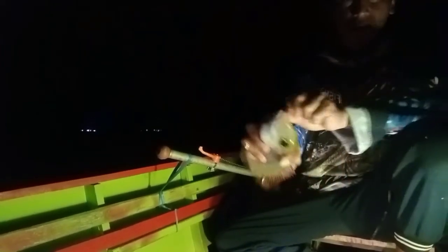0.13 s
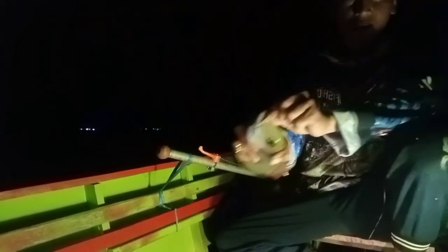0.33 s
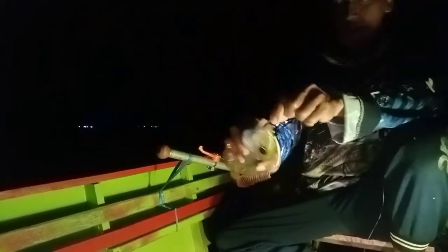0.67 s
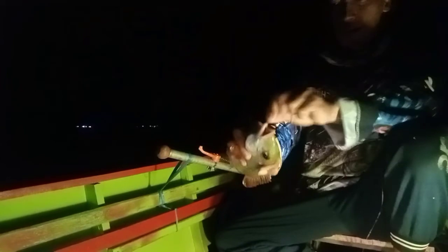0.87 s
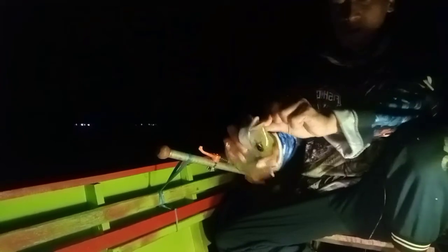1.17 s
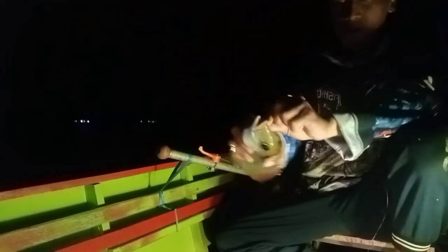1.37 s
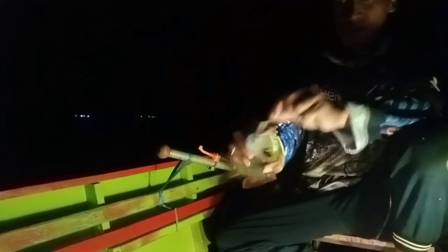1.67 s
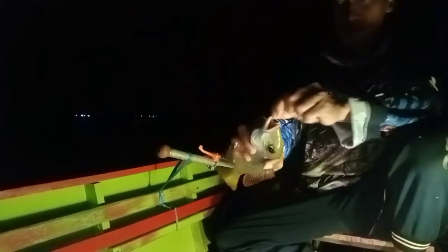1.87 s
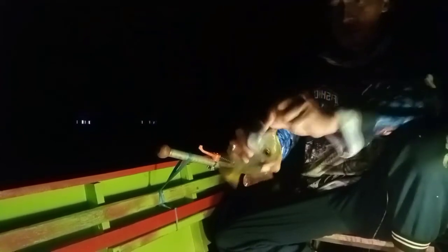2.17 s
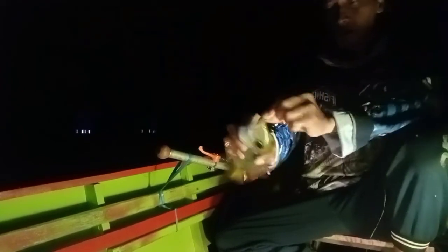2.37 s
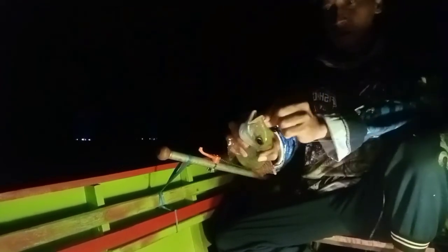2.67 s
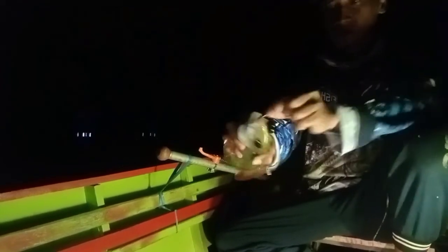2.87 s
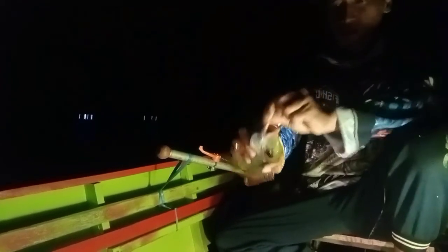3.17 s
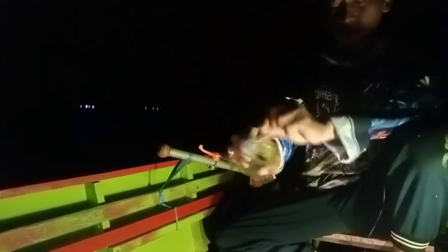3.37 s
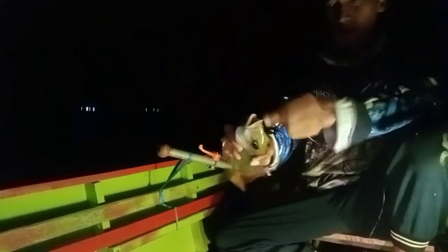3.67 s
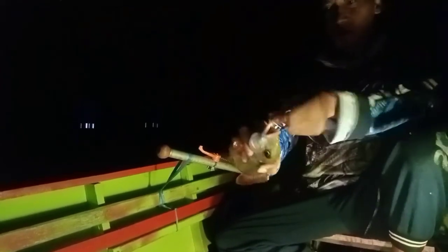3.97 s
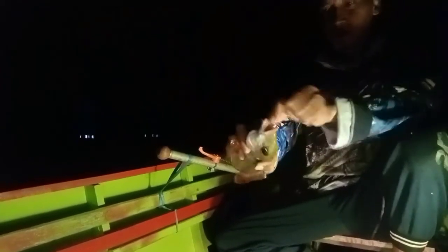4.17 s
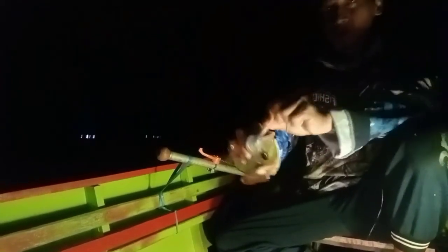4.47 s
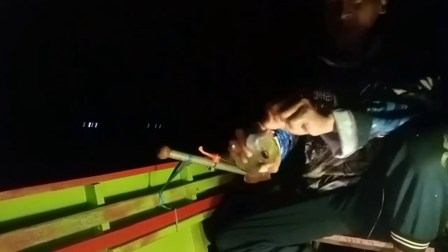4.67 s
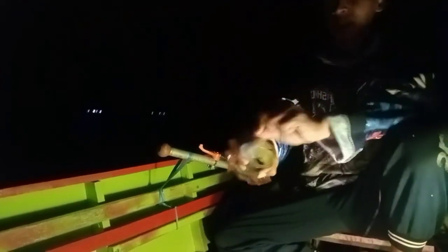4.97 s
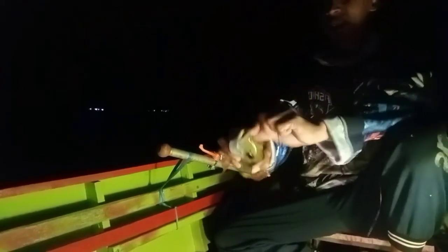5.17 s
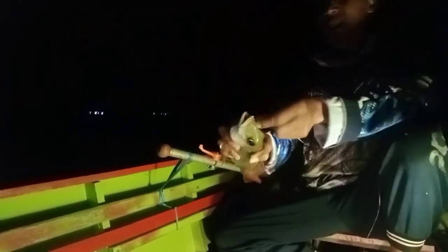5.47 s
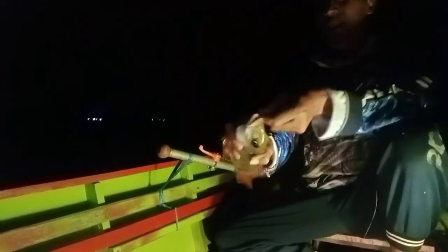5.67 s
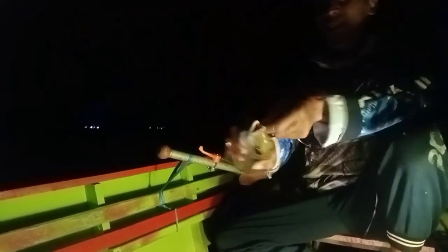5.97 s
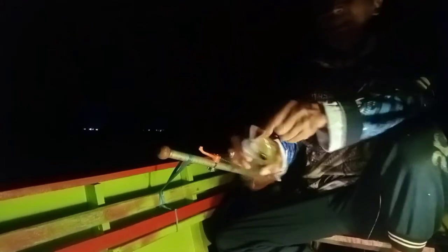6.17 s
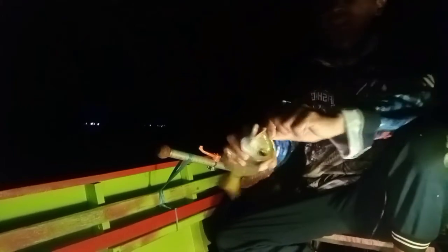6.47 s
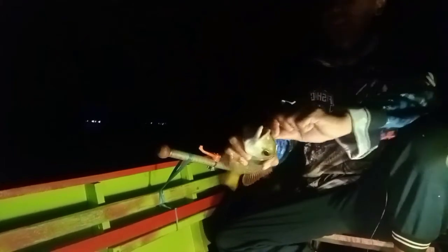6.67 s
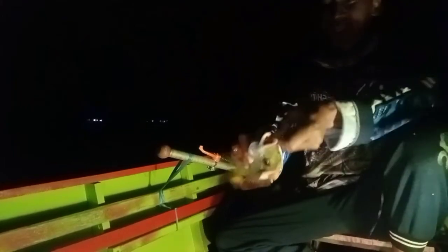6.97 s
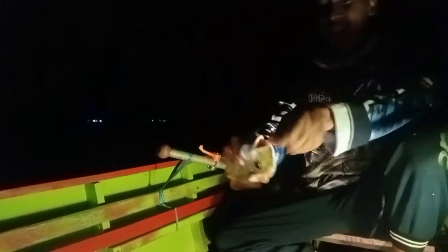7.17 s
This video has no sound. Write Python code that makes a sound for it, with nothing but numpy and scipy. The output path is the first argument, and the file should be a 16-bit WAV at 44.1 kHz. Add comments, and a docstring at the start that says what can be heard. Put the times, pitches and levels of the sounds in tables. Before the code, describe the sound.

Small waves slap and plop against a wooden boat while a hook clicks and scrapes as a fish is unhooked by hand.

```python
"""A small fish is unhooked by hand in a wooden boat drifting on calm water at night (right channel only).
A sharp hook click and a hull thud open the scene; wavelets slap the planks and trap air that plops.
From two seconds, hook and wet fingers click and scrape close by while skin, line and sleeve rub.
Just after four seconds the biggest slap throws spray that patters down; a round plop follows near six.
The clicks crowd together, the line squeaks once, and the hull ends on a swelling rumble and thuds."""
import sys
import numpy as np
from scipy import signal
from scipy.fft import rfft, irfft
from scipy.io import wavfile

SR = 44100
rng = np.random.default_rng(int(sys.argv[2]) if len(sys.argv) > 2 else 0)


def master(y):
    """Save y as 16-bit WAV."""
    cut = np.clip(np.atleast_2d(y).T, -1, 1)
    pcm = np.round(cut * 32767)  # scale
    wavfile.write(sys.argv[1], SR, pcm.astype(np.int16))


N = 322787


def from_db(db):
    """Decibels to gain."""
    return 10 ** (np.asarray(db) / 20)


def rms_one(x):
    """Scale to rms 1."""
    return x / np.sqrt(np.mean(x ** 2) + 1e-20)


def automation(points):
    """Join (time_s, value) points into one value per sample."""
    times, values = np.transpose(points)
    return np.interp(np.arange(N) / SR, times, values)


def add(track, start_s, sound):
    """Mix a sound into a track."""
    start = max(0, round(start_s * SR))
    track[start:start + len(sound)] += sound[:max(0, N - start)]


def seconds(length_s):
    """Time axis of a short sound, slightly padded."""
    return np.arange(int(length_s * SR) + 64) / SR


def band(x, low_hz, high_hz, order=2):
    """Butterworth band-pass."""
    high_hz = min(high_hz, .45 * SR)
    low_hz = min(low_hz, .9 * high_hz)
    return signal.sosfilt(signal.butter(order, [low_hz, high_hz], "band", fs=SR, output="sos"), x)


def resonance(x, hz, width_hz):
    """Two-pole resonance with unity gain at its peak."""
    radius = np.exp(-np.pi * width_hz / SR)
    feedback = [1, -2 * radius * np.cos(2 * np.pi * hz / SR), radius ** 2]
    return signal.lfilter(np.array([1, 0, -1]) * (1 - radius ** 2) / 2, feedback, x)


def resonator_bank(x, modes):
    """Parallel resonances from (pitch_hz, width_hz, gain_db) rows."""
    return sum(from_db(db) * resonance(x, hz, width_hz) for hz, width_hz, db in modes)


def coloured(x, spectrum):
    """Shape a full-length sound with an EQ curve; rms 1."""
    hz, db = np.transpose(spectrum)
    bins_hz = np.maximum(np.fft.rfftfreq(N, 1 / SR), 1)
    curve_db = np.interp(np.log(bins_hz), np.log(hz), db)
    return rms_one(irfft(rfft(x) * from_db(curve_db), N))


def drift(rate_hz):
    """Wandering random modulation; rms 1."""
    knots = rng.standard_normal(int(rate_hz * N / SR) + 2)
    return rms_one(np.interp(np.arange(N) / SR * rate_hz, np.arange(len(knots)), knots))


def swell(t, rise_s, t60_s):
    """Rounded attack to 1, then a decay of 60 dB every t60_s."""
    attack = np.sin(np.pi / 2 * np.minimum(t / rise_s, 1)) ** 2
    return attack * np.exp(-np.log(1000) * np.maximum(t - rise_s, 0) / t60_s)


def with_energy(x, envelope):
    """Give a burst the energy of unit noise under this envelope."""
    return x * np.sqrt(np.sum(envelope ** 2) / (np.sum(x ** 2) + 1e-20))


def grains(samples, per_s, spread_db):
    """Random tiny impacts of uneven size."""
    born = rng.random(samples) < per_s / SR
    polarity = rng.choice([-1, 1], samples)
    size = from_db(spread_db * np.clip(rng.standard_normal(samples), -2, 2))
    return born * polarity * size + 1e-12


def shower(db, centre_hz, octaves, rise_s, t60_s, per_s, spread_db):
    """A grainy burst: a shower of tiny impacts, band-passed around centre_hz."""
    t = seconds(rise_s + t60_s)
    envelope = swell(t, rise_s, t60_s)
    impacts = grains(len(t), per_s, spread_db) * envelope
    sound = band(impacts, centre_hz * 2 ** (-octaves / 2), centre_hz * 2 ** (octaves / 2), order=3)
    return from_db(db) * with_energy(sound, envelope)


def droplets(per_s, low_hz, high_hz, q, spread_db, pitches):
    """Small bubbles born at random, each ringing at one of a set of pitches; rms 1."""
    births = grains(N, per_s, spread_db)
    voice = rng.integers(0, pitches, N)
    return rms_one(sum(resonance(births * (voice == k), hz, hz / q) / np.sqrt(hz)
                       for k, hz in enumerate(np.geomspace(low_hz, high_hz, pitches))))


def rings(tones, rise_cycles, glide, wobble):
    """Damped tones; glide (over one t60) and random wobble are shares of the pitch."""
    out = np.zeros(N)
    for start_s, hz, db, t60_s in tones:
        rise_s = rise_cycles / hz
        t = seconds(rise_s + t60_s)
        jitter = np.interp(t * hz / 2, np.arange(256), rng.standard_normal(256))
        phase = 2 * np.pi * np.cumsum(hz * (1 + glide * t / t60_s + wobble * jitter)) / SR
        add(out, start_s, from_db(db) * swell(t, rise_s, t60_s) * np.sin(phase))
    return out


# Tone of the night air: frequency_hz, gain_db
AIR_EQ = [(60, -11), (150, 7.5), (300, 0), (500, -4.5), (700, -5.5), (950, -7.5), (1600, -13.5),
          (2700, -13), (3900, -20), (5200, -17.5), (6000, -31), (7000, -23), (7800, -25), (9500, -23.5),
          (12500, -26.5), (14500, -24.5)]
def night_air(hiss_db=-67.5, hollow_hz=1200, width_hz=104, hollow_db=-74, swing_db=4):
    """A bed of faint, steady hiss with one hollow resonance that wavers in level."""
    hollow = resonance(rng.standard_normal(N), hollow_hz, width_hz)
    hollow = rms_one(resonance(hollow, hollow_hz, width_hz))
    hollow *= from_db(hollow_db + swing_db * drift(rate_hz=7))
    return from_db(hiss_db) * coloured(rng.standard_normal(N), AIR_EQ) + hollow


# Level ride of the rocking boat, before the rumble's boost: time_s, level_db
ROCKING = [(0.0, -64), (0.22, -71), (1.41, -69), (1.61, -63.5), (1.89, -68.5), (2.16, -60.5), (2.75, -71.5),
           (3.97, -70.5), (4.3, -64.5), (4.56, -67.5), (4.89, -54.5), (5.11, -65), (5.38, -76), (5.81, -63),
           (6.2, -76.5), (7.01, -59), (7.22, -48), (7.32, -36)]
# Tone of the rumble: frequency_hz, gain_db
RUMBLE_EQ = [(25, -25), (45, -10.5), (70, 0.5), (105, -2), (150, -10), (240, -21), (400, -32), (800, -75)]
def hull_rumble(boost_db=8, lumps_db=2.5):
    """The rocking hull rumbles low, in lumps."""
    lumps = rms_one(from_db(lumps_db * drift(rate_hz=15)))
    return from_db(automation(ROCKING) + boost_db) * lumps * coloured(rng.standard_normal(N), RUMBLE_EQ)


# Soft thuds of the hull: start_s, pitch_hz, level_db, t60_s
THUDS = [(0.037, 147.6, -35.5, 0.27), (0.508, 71, -47.5, 0.41), (1.016, 94.5, -47, 0.55),
         (1.576, 72.5, -43.5, 0.42), (1.785, 69.5, -34, 0.12), (2.012, 65.6, -44, 0.12),
         (2.205, 74, -43.5, 0.17), (4.684, 72, -34, 0.15), (4.772, 85, -30, 0.2),
         (4.992, 73.5, -33.5, 0.11), (5.644, 66, -35.5, 0.073), (6.434, 96, -32.5, 0.077),
         (6.684, 68.5, -45.5, 0.17), (7.112, 76.5, -29, 0.37), (7.239, 86.5, -22, 0.2),
         (7.274, 101, -28, 0.24)]
# Partials of each thud: pitch_ratio, gain_db, t60_ratio
THUD_MODES = [(1, 0, 0.97), (2.45, -22, 0.36)]
def hull_thuds():
    """Now and then the hull thuds with two low partials that sag in pitch."""
    tones = [(start_s, hz * pitch_ratio, db + gain_db, t60_s * t60_ratio)
             for start_s, hz, db, t60_s in THUDS for pitch_ratio, gain_db, t60_ratio in THUD_MODES]
    return rings(tones, rise_cycles=1, glide=-.093, wobble=.12)


# Narrow, hollow-sounding resonances: pitch_hz, width_hz, gain_db
HOLLOW_MODES = [(611, 30, -4), (1200, 33, 2.5)]
def hollow_ring(x):
    """Two faint hollow resonances, near 600 and 1200 Hz, ring along with nearby sounds."""
    return resonator_bank(x, HOLLOW_MODES)


def boat_echo(x, rise_s=.0079, t60_s=.077, echo_db=-15):
    """Planks and thwarts throw back a short, dull scatter."""
    t = seconds(2 * t60_s)
    scatter = band(rng.standard_normal(len(t)), 150, 3200, order=1) * swell(t, rise_s, t60_s)
    scatter /= np.sqrt(np.sum(scatter ** 2))
    return from_db(echo_db) * signal.fftconvolve(x, scatter)[:N]


# Wetness ride; fizz and sticky skin follow its swing around the mean: time_s, level_db
WETNESS = [(0.0, -91), (0.8, -79.5), (1.1, -65), (1.4, -92), (1.8, -76.5), (2.22, -73), (2.42, -86),
           (2.8, -77.5), (3.3, -87.5), (3.75, -87.5), (4.12, -73), (4.26, -67.5), (4.42, -70), (4.62, -68),
           (4.95, -84), (5.45, -85.5), (5.95, -72), (6.4, -74.5), (6.85, -86.5), (7.1, -56), (7.32, -70)]
def wetness_gain(base_db, follows):
    """A gain that rises above base_db when things are wetter and falls when they are drier."""
    wetness_db = automation(WETNESS)
    return from_db(base_db + follows * (wetness_db - wetness_db.mean()))


# Tone of the fizz: frequency_hz, gain_db
FIZZ_EQ = [(500, 3.5), (1200, 2.5), (2700, 3.5), (4600, -2), (5800, -1), (7400, -10.5), (8800, -3),
           (11500, -12), (15000, -9)]
def wet_fizz(clump_db=3.5):
    """Water films burst on scales, fingers and planks: a softly clumped fizz with tiny pitched pops."""
    pops = droplets(per_s=1200, low_hz=1300, high_hz=14000, q=26, spread_db=3, pitches=30)
    crackle = rms_one(grains(N, per_s=9000, spread_db=3))
    clumps = from_db(clump_db * drift(rate_hz=40))
    return wetness_gain(base_db=-76, follows=.77) * coloured((crackle + pops) * clumps, FIZZ_EQ)


# Water swelling along the planks: start_s, level_db, centre_hz, t60_s
SURGES = [(1.893, -56, 397, 0.081), (2.034, -66, 240, 0.087), (2.126, -57, 560, 0.063),
          (2.837, -58.5, 1200, 0.15), (4.183, -50.5, 860, 0.41), (4.234, -45.5, 850, 0.2),
          (4.92, -66, 1010, 0.19), (5.061, -65, 1200, 0.38), (5.172, -70, 1430, 0.067),
          (5.97, -65, 1000, 0.39), (6.882, -58.5, 720, 0.21), (6.94, -50.5, 760, 0.32)]
def surges(wash_db=-2.5, bubbles_db=-1, octaves=2.8, rise_share=.11):
    """Water swells along the planks as a soft wash with bubbles in it."""
    wash, flow = np.zeros(N), np.zeros(N)
    for start_s, db, hz, t60_s in SURGES:
        rise_s = rise_share * t60_s
        add(wash, start_s, shower(db, hz, octaves, rise_s, t60_s, per_s=4500, spread_db=0))
        add(flow, start_s, from_db(db) * swell(seconds(rise_s + t60_s), rise_s, t60_s))
    bubbles = droplets(per_s=300, low_hz=480, high_hz=1500, q=18, spread_db=2.5, pitches=14)
    return from_db(wash_db) * wash + from_db(bubbles_db) * flow * bubbles


# Bunches of spray landing: start_s, level_db, centre_hz
SPLATS = [(4.373, -58.5, 5300), (4.388, -53.5, 3900), (4.417, -54, 5490), (4.438, -52, 3850),
          (4.471, -55, 6900), (4.528, -51.5, 3300), (4.54, -56, 3520), (4.573, -54.5, 3830),
          (4.58, -55, 6900), (4.605, -54.5, 5060)]
def spray(start_s=4.34, rise_s=.06, t60_s=1.15, level_db=-57, bubbles_db=-1, bunch_db=2):
    """Spray from the biggest slap falls back as a dense patter with wet splats and small bubbles."""
    falling, splats = np.zeros(N), np.zeros(N)
    drops = droplets(per_s=2600, low_hz=2000, high_hz=9500, q=14, spread_db=2.5, pitches=26)
    bunches = from_db(bunch_db * drift(rate_hz=70))
    patter = rms_one(band(drops * bunches, 2300, 6500, order=1))
    bubbles = droplets(per_s=260, low_hz=520, high_hz=2200, q=24, spread_db=2.5, pitches=18)
    add(falling, start_s, from_db(level_db) * swell(seconds(rise_s + t60_s), rise_s, t60_s))
    for splat_s, db, hz in SPLATS:
        splat = shower(db, hz, octaves=1.07, rise_s=.0025, t60_s=.05, per_s=2700, spread_db=4)
        add(splats, splat_s, splat)
    return falling * (patter + from_db(bubbles_db) * bubbles) + splats


# Single drips and bubbles: start_s, pitch_hz, level_db
DRIPS = [(1.572, 2770, -42), (1.707, 2650, -43), (1.859, 1990, -47), (2.551, 427, -54.5), (2.6, 950, -53.5),
         (2.632, 832, -46), (4.35, 623, -52), (4.378, 970, -55), (4.427, 746, -50), (4.537, 670, -55.5),
         (4.547, 1420, -53), (4.583, 1880, -44), (4.622, 677, -50.5), (4.65, 1970, -53.5), (4.9, 1560, -55),
         (5.083, 1430, -52), (5.18, 1605, -50), (5.245, 377, -60), (5.793, 853, -52), (6.001, 1390, -52),
         (6.086, 735, -53), (6.152, 1216, -48), (6.186, 690, -58.5), (6.215, 2380, -61),
         (6.316, 930, -56.5), (6.832, 540, -54.5), (6.912, 740, -50), (6.98, 670, -52), (6.996, 570, -48),
         (7.021, 665, -49), (7.044, 608, -49.5)]
def drips(t60_cycles=34):
    """Single bubbles chirp upward; all ring for as many cycles, so high ones die sooner."""
    tones = [(start_s, hz, db, t60_cycles / hz) for start_s, hz, db in DRIPS]
    return rings(tones, rise_cycles=2.2, glide=.038, wobble=.072)


# Wavelets on the planks (splash and knock are relative to the slap):
# start_s, level_db, centre_hz, width_octaves, rise_s, t60_s, splash_db, knock_db
WAVELETS = [(.023, -34.5, 258, 1.08, 0.0085, 0.17, -25, -10), (0.065, -44.5, 283, 1.3, .003, 0.047, -9, -2),
            (.175, -62, 387, 0.78, .005, 0.12, -22, -8), (1.013, -36.5, 250, 1.38, 0.012, 0.25, -15, -9),
            (1.072, -34, 980, 1.67, 0.0051, 0.071, -17, -20.5),
            (2.286, -49, 1290, 2.4, 0.0071, 0.12, -8, -10),
            (2.314, -32.5, 680, 1.1, 0.0042, 0.057, -21, -12.5),
            (2.656, -37.5, 870, 2.4, 0.0013, 0.059, -16, -12),
            (2.693, -44.5, 840, 1.1, .006, 0.079, -8, -9),
            (2.744, -46, 1520, 1.86, 0.0046, 0.056, -16, -11.5),
            (2.803, -49.5, 920, 1.2, 0.0025, 0.057, -16, -17),
            (4.162, -32, 1160, 1.56, 0.0047, .1, -18, -17), (4.256, -36.5, 915, 2.6, 0.02, 0.11, -15, 1.5),
            (4.274, -28.5, 770, 2.5, 0.0023, 0.049, -22, -10.5),
            (4.994, -56, 190, 1.4, 0.0028, 0.15, -10, -6), (5.119, -56.5, 950, 2.4, 0.0026, 0.13, -21, -13),
            (5.861, -31.5, 295, 1.6, .005, 0.16, -15, -4.5),
            (5.937, -49.5, 980, 1.3, .003, 0.085, -19, 0.5),
            (6.864, -52.5, 1460, 1.6, 0.0027, 0.056, -22, -19),
            (7.111, -29.5, 926, 1.42, 0.0038, 0.075, -29, -5)]
def slaps(splash_hz=1480, splash_octaves=1.57, splash_stretch=1.24):
    """Wavelets hit the planks; each slap carries a fine splash that lasts a little longer."""
    out = np.zeros(N)
    for start_s, db, hz, octaves, rise_s, t60_s, splash_db, _ in WAVELETS:
        add(out, start_s, shower(db, hz, octaves, rise_s, t60_s, per_s=5000, spread_db=2))
        add(out, start_s, shower(db + splash_db, splash_hz, splash_octaves, rise_s,
                                 splash_stretch * t60_s, per_s=5800, spread_db=4))
    return out


# Wooden body of each knock: pitch_hz, gain_db
PLANK_MODES = [(184, 2.5), (238, 1.5)]
def plank_knocks(t60_s=.1):
    """The planks answer each slap with a low knock."""
    tones = [(start_s, hz, db + knock_db + gain_db, t60_s)
             for start_s, db, *_, knock_db in WAVELETS for hz, gain_db in PLANK_MODES]
    return rings(tones, rise_cycles=2.8, glide=0, wobble=.019)


# Air pockets under the wavelets: start_s, pitch_hz, level_db, t60_s, glide_share
POCKETS = [(.025, 319, -34.5, .12, 0), (.041, 308, -29.5, 0.12, -0.031), (.071, 290, -32.5, 0.065, 0.041),
           (0.178, 383, -46.5, 0.14, 0), (1.016, 375, -37, .14, -0.06), (1.027, 263, -35, .11, 0),
           (1.049, 353, -34, 0.074, 0), (1.079, 1244, -25.5, 0.038, 0.059), (2.293, 1104, -33, 0.12, -0.12),
           (2.315, 383, -32.5, 0.082, -0.017), (2.319, 771, -26.5, 0.046, 0.11),
           (2.323, 938, -33.5, 0.056, -0.011), (2.659, 246, -32, 0.066, 0), (2.679, 260, -45, 0.055, 0),
           (2.693, 1200, -44, 0.055, -0.22), (2.707, 233, -42, .07, 0.048), (2.709, 613, -40, 0.033, 0),
           (2.745, 1360, -44.5, 0.029, 0), (2.806, 1166, -47.5, 0.04, -0.019),
           (4.163, 1382, -30, 0.042, -0.022), (4.17, 400, -38, 0.13, 0.018), (4.267, 1267, -32.5, .07, 0),
           (4.272, 183, -25.5, 0.15, -0.028), (4.275, 464, -31, 0.06, -0.025),
           (4.276, 637, -32, .05, -0.025), (4.339, 283, -44, 0.036, -0.026), (4.368, 576, -42.5, .11, 0.16),
           (4.998, 180, -43, .13, 0), (5.125, 672, -48.5, 0.038, 0), (5.861, 233, -27, .1, -0.073),
           (5.87, 338, -18.5, 0.097, -0.13), (5.872, 436, -26, .1, -0.0092),
           (5.9, 321, -25.5, 0.096, 0.022), (5.904, 764, -37.5, 0.057, 0), (5.926, 289, -35, 0.078, 0.024),
           (5.936, 1200, -50.5, .06, 0), (7.11, 270, -24, 0.092, 0.015), (7.113, 1238, -35, 0.08, -0.047),
           (7.117, 597, -20, 0.066, -0.024), (7.132, 576, -28.5, 0.14, 0.02)]
def plops():
    """Trapped air plops; its pitch slides as the pocket is squeezed or opens out."""
    return sum(rings([tone], rise_cycles=1.32, glide=glide, wobble=.06) for *tone, glide in POCKETS)


def lapping_water(gurgle_db=-28, calm_db=-80, settle_s=.09):
    """Slaps, plops, knocks and drips; small bubbles gurgle after each slap until the water settles."""
    hits = slaps()
    release = np.exp(-1 / (settle_s * SR))
    stirred = np.sqrt(signal.lfilter([1 - release], [1, -release], hits ** 2) + 1e-18)  # rms follower
    bubbles = droplets(per_s=160, low_hz=500, high_hz=2400, q=18, spread_db=3.5, pitches=26)
    gurgle = (from_db(gurgle_db) * stirred + from_db(calm_db)) * bubbles
    return hits + gurgle + plops() + plank_knocks() + drips()


def sticky_skin(smacks_per_s=16, range_db=9, low_hz=2400, high_hz=9000):
    """Wet skin peels off fingers and sleeve in soft, irregular smacks, louder when things are wetter."""
    out = np.zeros(N)
    for when, softness, height in rng.random((int(smacks_per_s * N / SR), 3)):
        hz = low_hz * (high_hz / low_hz) ** (height ** 2)  # favours the low end
        smack = shower(-range_db * softness, hz, octaves=.7, rise_s=.012, t60_s=.07,
                       per_s=3000, spread_db=3)
        add(out, when * N / SR, smack)
    return wetness_gain(base_db=-66, follows=.5) * out


# Strokes of line, fins and sleeve, plus bright treble edges of the hook clicks near 0.04, 2.28 and 3.19 s:
# start_s, level_db, centre_hz, t60_s
RUBS = [(0.036, -37.5, 11400, 0.037), (0.045, -56, 3650, 0.26), (1.547, -62.5, 4400, 0.21),
        (1.895, -49, 6750, 0.075), (1.994, -58.5, 8900, 0.1), (2.279, -31, 6500, 0.02),
        (2.285, -51.5, 4820, 0.13), (2.652, -44, 8100, 0.08), (2.732, -43.5, 11500, 0.06),
        (2.745, -47.5, 6760, 0.043), (2.855, -63.5, 8500, 0.069), (2.981, -67, 5500, 0.12),
        (3.022, -66, 5000, 0.022), (3.143, -59, 4500, 0.034), (3.186, -50, 11600, 0.037),
        (3.23, -56, 4470, 0.028), (3.316, -68.5, 5530, 0.12), (3.536, -65, 6450, 0.045),
        (3.872, -63, 6000, 0.12), (4.682, -63, 2200, 0.34), (4.681, -61, 7440, 0.11),
        (4.742, -54.5, 2220, 0.21), (5.12, -65, 3970, 0.12), (5.739, -58, 4160, 0.022),
        (5.848, -58.5, 5000, 0.12), (5.892, -56, 7340, 0.14), (5.939, -56.5, 6300, 0.064),
        (6.1, -58.5, 4600, 0.075), (6.158, -55, 5960, 0.051), (6.262, -59, 3200, 0.07),
        (6.305, -57.5, 4600, 0.07), (6.446, -62.5, 6500, 0.078), (6.473, -58, 3380, 0.051),
        (6.952, -41.5, 10800, 0.092), (6.955, -50.5, 2410, 0.084), (7, -61, 3780, 0.12),
        (7.061, -51.5, 3000, 0.087)]
def rubs(octaves=1.58, rise_share=.08):
    """Line, fins and sleeve rub in short, crackly strokes, and three hook clicks get an extra bright edge;
    longer strokes have a softer attack."""
    out = np.zeros(N)
    for start_s, db, hz, t60_s in RUBS:
        add(out, start_s, shower(db, hz, octaves, rise_share * t60_s, t60_s, per_s=2900, spread_db=1.5))
    return out


def line_squeak(start_s=7.04, length_s=.073, pitch_hz=1705, level_db=-53, sag_share=.015):
    """The wet line slips once with a thin, slightly falling squeak."""
    out, t = np.zeros(N), seconds(length_s)
    arch = np.sqrt(np.abs(np.sin(np.pi * t / t[-1])))
    phase = 2 * np.pi * np.cumsum(pitch_hz * (1 - sag_share * t / length_s)) / SR
    add(out, start_s, from_db(level_db) * arch * np.sin(phase))
    return out


# Drags of the hook: start_s, level_db, length_s
SCRAPES = [(2.1, -65, .18), (2.87, -65, .07), (3.15, -64, .1), (5.09, -66, .13), (6.16, -68, .12),
           (6.37, -66, .07), (6.47, -64, .04)]
# Ring of the dragging hook: pitch_hz, width_hz, gain_db
SCRAPE_MODES = [(2050, 110, -5), (2680, 110, 0), (3500, 170, -5)]
def hook_scrapes():
    """The hook drags through the fish's mouth in soft, grainy, ringing strokes."""
    strokes = np.zeros(N)
    for start_s, db, length_s in SCRAPES:
        arch = np.sin(np.pi * np.linspace(0, 1, len(seconds(length_s))))
        add(strokes, start_s, from_db(db) * arch)
    friction = grains(N, per_s=2500, spread_db=3)
    return strokes * rms_one(resonator_bank(friction, SCRAPE_MODES))


# Ring of a click: pitch_hz, width_hz, gain_db
CLICK_MODES = [(2650, 170, 7.5), (3100, 1080, 5.5), (3530, 180, 9.5), (4350, 250, 5.5), (5510, 180, 7.5)]
def click_ring(contact, centre_hz, detune_share=.019, falloff_db_per_octave=13, min_width_share=.07):
    """Modes near the pitch of the contact ring loudest; each grip detunes them a little."""
    grip = 1 + detune_share * rng.standard_normal()
    ring = np.zeros(len(contact))
    for k, (hz, width_hz, db) in enumerate(CLICK_MODES):
        gain = from_db(db - falloff_db_per_octave * abs(np.log2(hz / centre_hz)))
        damped_width_hz = max(width_hz, min_width_share * hz)  # wet skin damps the ring
        ring += (-1) ** k * gain * rms_one(resonance(contact, hz * grip, damped_width_hz))
    return band(ring, 1810, 6000)


def click_snap(contact, top_db=-17):
    """The bright edge of a click: two treble resonances and a little broadband crack."""
    edge = resonance(contact, 6720, width_hz=440) - resonance(contact, 8940, width_hz=770)
    return band(edge, 3200, 8300, order=1) + from_db(top_db) * band(contact, 2200, 12800)


# Hook and wet finger clicks (knock and snap are offsets from the level, before the trims):
# start_s, level_db, centre_hz, knock_db, snap_db
CLICKS = [(0.038, -21, 2620, -16.5, -22), (0.478, -47, 4560, -20, -28), (0.624, -58, 5090, -28, 0),
          (1.223, -50, 4400, -26, -20), (1.691, -46, 2560, -38, -28), (2.204, -43, 2600, -30, -22),
          (2.2507, -36.5, 3530, -27, -15), (2.261, -47, 2580, -13, -5), (2.279, -23, 2660, -21, -20),
          (2.657, -35, 2070, -11, -12), (3.1621, -44, 2160, -19, -16), (3.188, -38.5, 2650, -29, -32),
          (3.1981, -37.5, 2640, -15, -16), (3.5297, -36.5, 2560, -8, -13.5), (4.271, -29, 2120, -7, -47),
          (4.749, -36, 2620, -18, -25), (4.7864, -35, 2400, -11, -20), (4.79, -23.5, 2940, -6, -30),
          (4.8628, -42.5, 2150, 1.5, 1), (5.6825, -46, 4350, -14, -35), (5.7654, -29.5, 4570, -20.5, -19),
          (5.7709, -37, 4500, -9, -11.5), (6.127, -38.5, 2630, -10, -5.5), (6.273, -28, 4200, -25.5, -25),
          (6.377, -41, 2190, -7, -21), (6.4856, -43, 3000, -36, -23), (6.5858, -47, 4380, -27, -25),
          (6.65, -53.5, 2080, -4, 1), (7.0285, -29, 4460, -14.5, -16), (7.157, -26, 3620, -18, -20),
          (7.196, -28, 4230, -18.5, -23)]
def hook_clicks(chatter_db=-15, chatter_cycles=32, ring_trim_db=-13, knock_trim_db=-5, snap_trim_db=-5):
    """A sharp crack and a brief chatter sound as a ring, a dull knock and a bright snap."""
    out = np.zeros(N)
    for start_s, level_db, centre_hz, knock_db, snap_db in CLICKS:
        t60_s = chatter_cycles / centre_hz  # high clicks die sooner
        t = seconds(2 * t60_s)
        crack = swell(t, rise_s=.0018, t60_s=.008)
        chatter = from_db(chatter_db) * swell(t, rise_s=.0086, t60_s=t60_s)
        envelope = crack + chatter
        contact = grains(len(t), per_s=14000, spread_db=2) * envelope
        layers = [(ring_trim_db, click_ring(contact, centre_hz)),
                  (knock_db + knock_trim_db, band(contact, 1125, 2340)),
                  (snap_db + snap_trim_db, click_snap(contact))]
        for layer_db, layer in layers:
            add(out, start_s, from_db(level_db + layer_db) * with_energy(layer, 2 * envelope))
    return out


def click_haze(base_db=-68.5, follows=.55, lead_s=.016):
    """A faint grainy haze surrounds each click and softens its attack, more around the strong ones."""
    out = np.zeros(N)
    mean_db = np.mean([db for _, db, *_ in CLICKS])
    for click_s, click_db, hz, *_ in CLICKS:
        db = base_db + follows * (click_db - mean_db)
        haze = shower(db, hz, octaves=1.5, rise_s=lead_s, t60_s=.11, per_s=1700, spread_db=5.5)
        add(out, click_s - lead_s, haze)
    return out


def unhooking():
    """The hook and wet fingers click and scrape; skin sticks; line, fins and sleeve rub."""
    return hook_clicks() + click_haze() + hook_scrapes() + sticky_skin() + rubs() + line_squeak()


# Bands the microphone port subtracts: centre_hz, width_hz, subtracted_gain_db
PORT_DIPS = [(5830, 670, -3), (7490, 570, -5.5), (12200, 2100, 1.5)]
def microphone_port(x):
    """The microphone port takes narrow dips out of the treble."""
    return x - resonator_bank(x, PORT_DIPS)


def scene():
    """Water and hands with a faint ring and echo, over hull and night air; the left channel is silent."""
    close = microphone_port(lapping_water() + surges() + spray() + unhooking()) + wet_fizz()
    foreground = close + hollow_ring(close) + boat_echo(close)
    mix = foreground + hull_rumble() + hull_thuds() + night_air()
    return np.stack([np.zeros(N), 2 * mix])


def record(dry):
    """A steep low-pass cuts the very top."""
    cutoff_hz = 15100
    return signal.sosfilt(signal.ellip(10, .2, 80, cutoff_hz, fs=SR, output="sos"), dry)


dry = scene()
out = record(dry)
master(out)
```